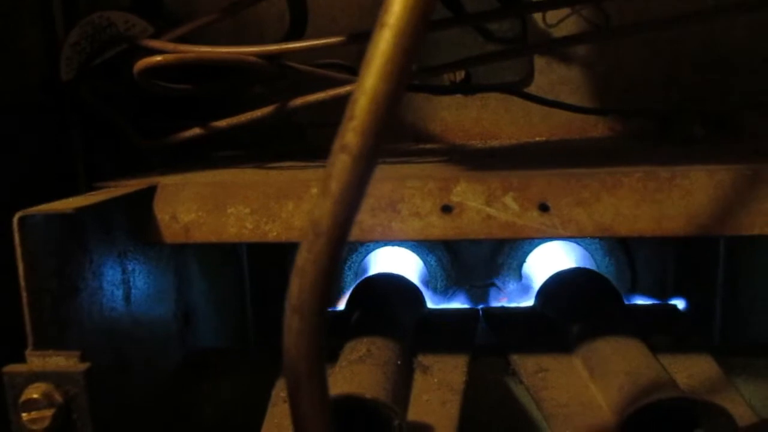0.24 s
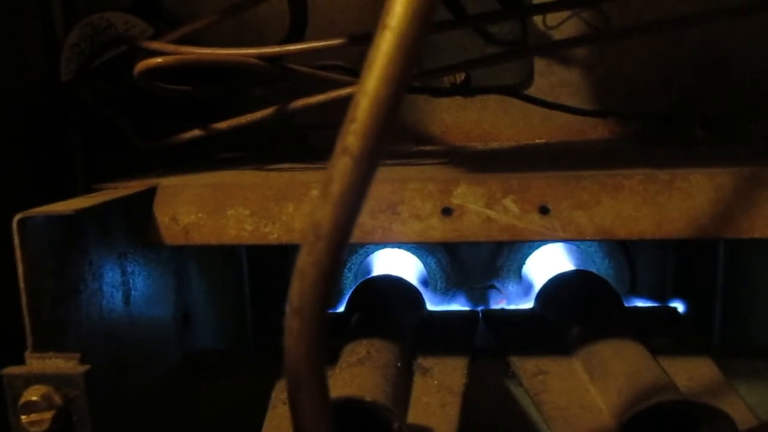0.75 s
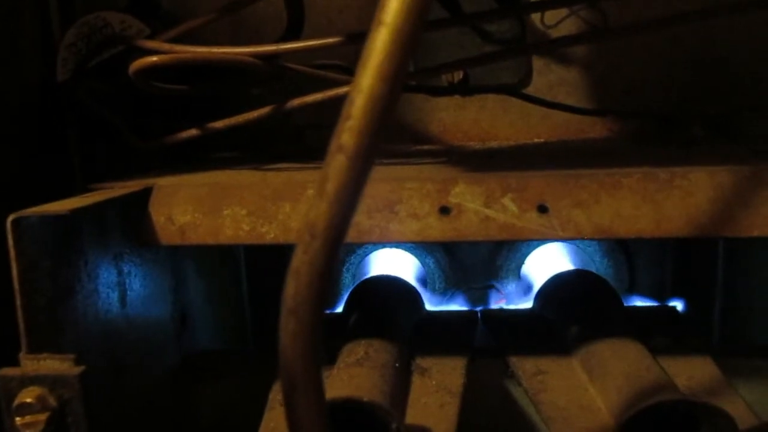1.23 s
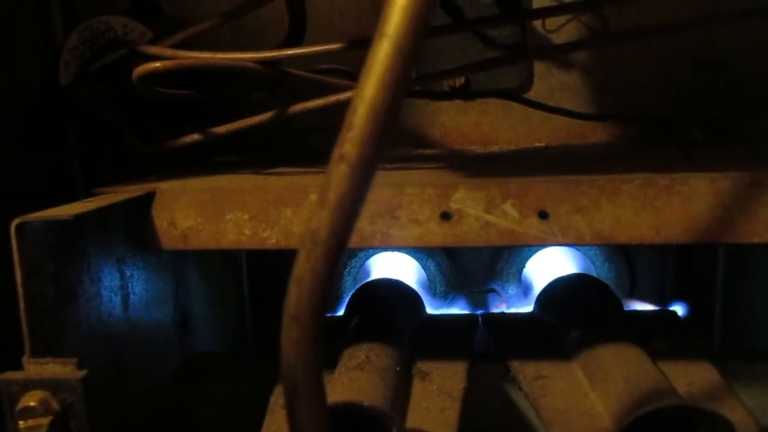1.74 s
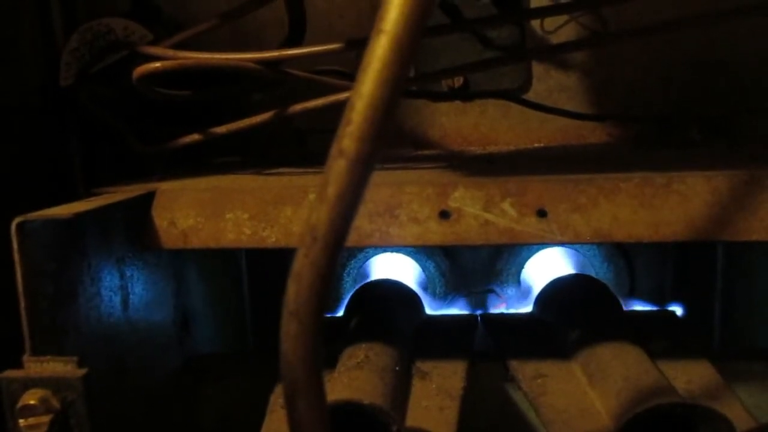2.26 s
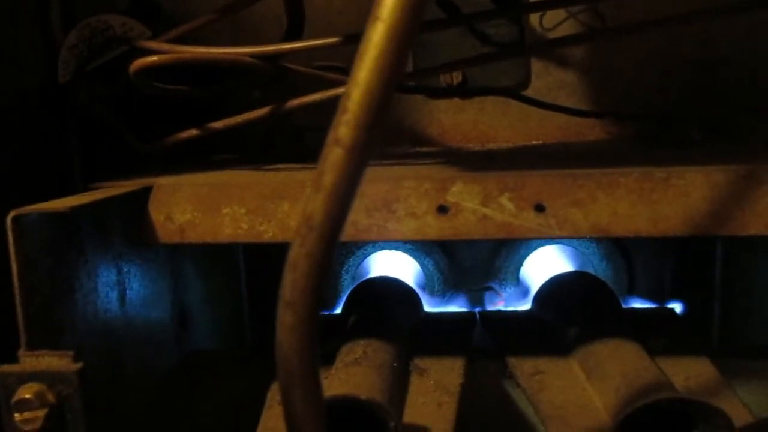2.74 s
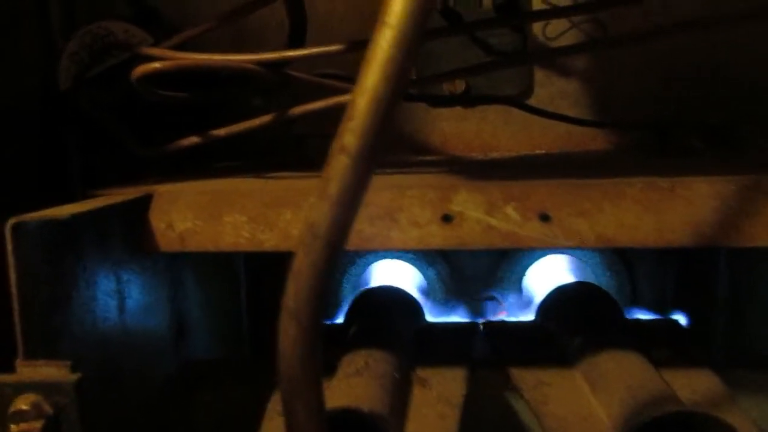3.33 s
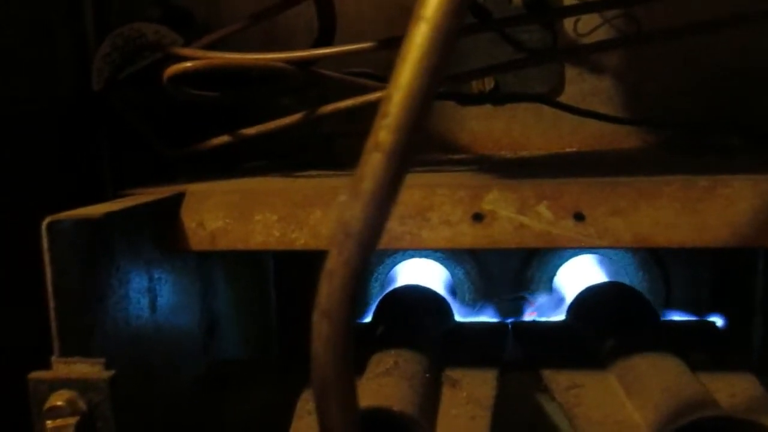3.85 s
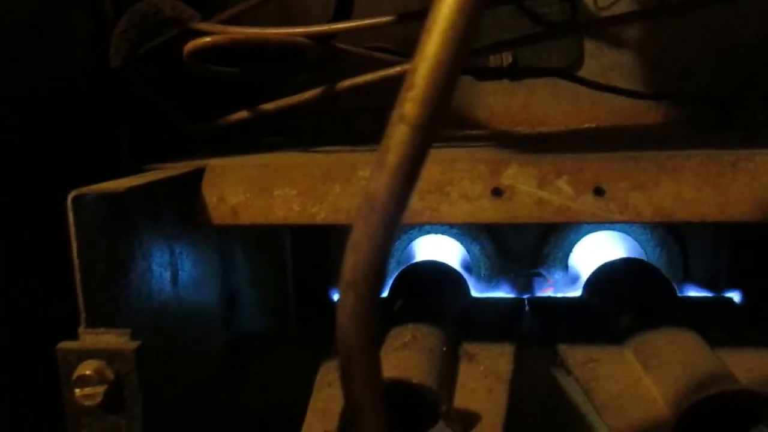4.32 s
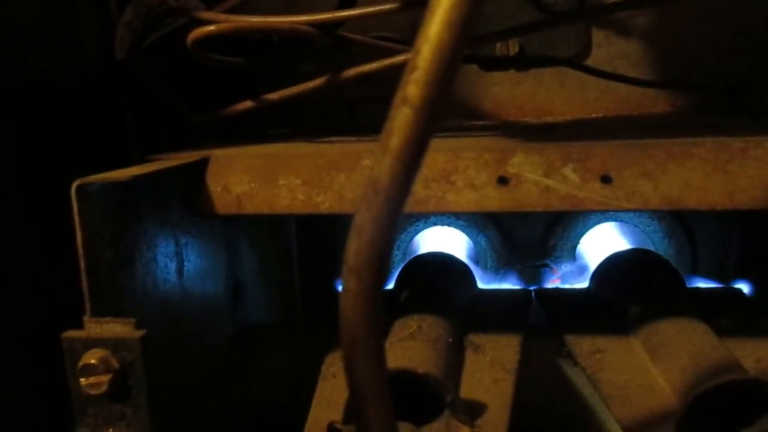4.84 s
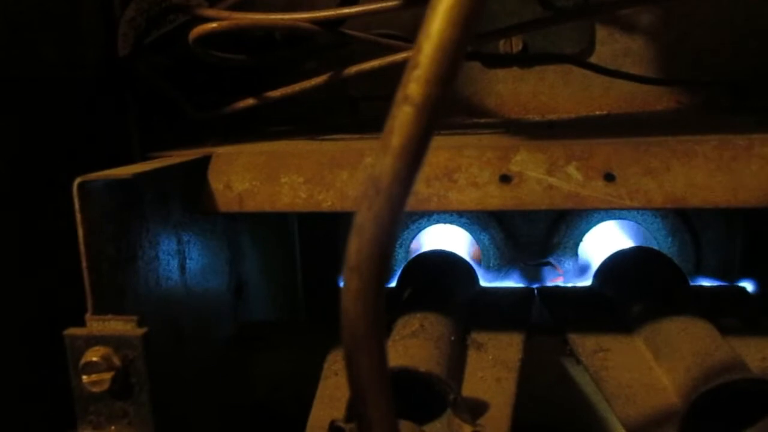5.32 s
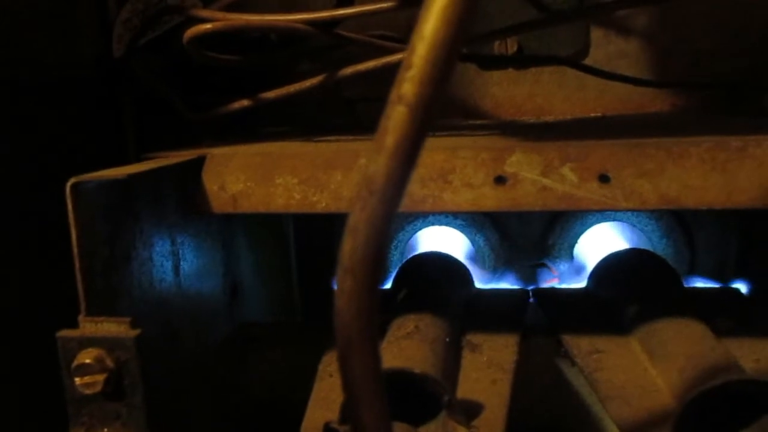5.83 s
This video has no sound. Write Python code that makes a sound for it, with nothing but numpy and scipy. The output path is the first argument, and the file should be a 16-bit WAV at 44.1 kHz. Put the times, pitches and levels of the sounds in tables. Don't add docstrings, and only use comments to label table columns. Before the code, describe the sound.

Continuous furnace burner roar, dominated by bass: uneven, pulsing rumble from a sheet-metal chamber, hollow ringing exchanger tubes and muted flame noise. Gas jets add a quiet, slightly whistling hiss, and blower motors hold a faint tone near 920 hertz. Mono close microphone in a small indoor space; strong bass surges press the level near its ceiling, and automatic gain dips slightly then creeps up again.

```python
import sys
import numpy as np
from scipy import signal
from scipy.fft import rfft, irfft, next_fast_len
from scipy.io import wavfile
from scipy.ndimage import uniform_filter1d

SR = 44100
rng = np.random.default_rng(int(sys.argv[2]) if len(sys.argv) > 2 else 0)


def undo_db(level):
    steps = np.asarray(level, float) / 20
    return 10 ** steps


def pcm_store(signal):
    levels = np.round(np.clip(np.atleast_2d(signal), -1, 1) * 32767)
    wavfile.write(sys.argv[1], SR, levels.astype(np.int16).T)


N = 267819
T = np.arange(N) / SR
M = next_fast_len(N)
HZ = np.fft.rfftfreq(M, 1 / SR)


def evened(x):
    return x / np.sqrt(np.mean(x ** 2) + 1e-20)


def read(points, hz):
    f, value = np.transpose(points)
    return np.interp(np.log(hz + 1), np.log(f + 1), value)


def bell(x):
    return np.exp(-np.log(16) * x ** 2)


def noise(colour_db):
    white = rfft(rng.standard_normal(M))
    return evened(irfft(white * undo_db(colour_db), M)[:N])


def drift(top_hz):
    return noise(-10 * np.log10(1 + (HZ / top_hz) ** 4))


def surging(s, peak_db, length_s, rest_db, throb_db=2):
    throb_hz, steady_s = 33, 0.47
    lull_db, lull_span = -5.5, 0.87
    apart = (T[::64, None] - s) / length_s
    lull = bell(apart / (2 * lull_span)).max(1)
    throb = drift(throb_hz)
    throb = evened(throb - uniform_filter1d(throb, int(steady_s * SR)))[::64]
    rest = undo_db(2 * (rest_db + throb_db * throb + lull_db * lull))
    power = rest + bell(apart) @ undo_db(2 * peak_db)
    return np.interp(T, T[::64], 10 * np.log10(power))


def mode(colour_db, level_db, hold_s):
    ring = noise(colour_db)
    swell = signal.oaconvolve(ring ** 2, np.hanning(int(hold_s * SR)), "same")
    return evened(ring / np.sqrt(swell + 0.26 * swell.mean())) * undo_db(level_db)


# t/s, upper mode level/dB, lower mode level/dB, length/s
BOOM_SURGES = [(0.134, -18, -9.5, 0.042), (0.238, -11, -30, 0.046), (0.337, -14.5, -15.5, 0.033),
               (0.525, -15, -17, 0.044), (0.643, -16, -21, 0.044), (0.73, -19, -10, 0.015),
               (0.98, -12.5, -31, 0.13), (1.108, -10, -22, 0.029), (1.327, -12, -16, 0.036),
               (1.63, -10.5, -29, 0.029), (1.753, -12.5, -12.5, 0.042), (1.886, -32, -15, 0.046),
               (2.05, -24, -15, 0.051), (2.164, -13, -5.5, 0.021), (2.621, -15.5, -11.5, 0.037),
               (2.815, -12, -11, 0.071), (3.032, -11.5, -24, 0.079), (3.139, -8.5, -22.7, 0.032),
               (3.336, -14.5, -18, 0.065), (3.45, -15, -35, 0.1), (3.7, -10.4, -16, 0.046),
               (3.82, -7, -26, 0.017), (3.9, -11.5, -15.5, 0.11), (4.329, -8, -12, 0.042),
               (4.916, -8.3, -21, 0.074), (5.281, -7.5, -23, 0.021), (5.566, -9.5, -16, 0.024),
               (5.771, -8.5, -27, 0.029), (5.882, -9.5, -14.5, 0.022), (6.013, -14.5, -15, 0.09)]
# t/s, level/dB, length/s
TUBE_SURGES = [(0.092, -19, 0.039), (0.554, -17, 0.042), (0.688, -24.5, 0.087), (0.819, -18, 0.021),
               (0.927, -19.5, 0.073), (1.193, -29, 0.027), (1.387, -18.2, 0.11), (1.88, -22, 0.059),
               (1.976, -17, 0.035), (2.178, -17.5, 0.017), (2.383, -20, 0.02), (2.466, -22, 0.062),
               (2.949, -20, 0.049), (3.045, -19.5, 0.022), (3.124, -19, 0.031), (3.214, -24.5, 0.085),
               (3.316, -18, 0.03), (3.469, -28, 0.062), (3.623, -19.3, 0.028), (3.702, -18.5, 0.021),
               (3.928, -20, 0.048), (4.35, -18, 0.081), (4.834, -19.5, 0.027), (4.928, -17, 0.051),
               (5.12, -18, 0.043), (5.52, -22, 0.077), (5.712, -17, 0.012), (5.817, -21, 0.092)]
# f/Hz, density/(dB per Hz)
BOOM_COLOUR = [(21, -46), (35, -24), (54, -22.5), (85, -6), (108, 3), (128, 0.5), (156, -15), (190, -29),
               (250, -41), (420, -120)]
# f/Hz, density/(dB per Hz)
TUBE_COLOUR = [(150, -59), (250, -20.5), (284, -0.5), (296, 8.5), (312, 3), (345, -30.5), (450, -52),
               (760, -120)]


def chamber(split_hz=104):
    s, upper_db, lower_db, length_s = np.transpose(BOOM_SURGES)
    boom_db = read(BOOM_COLOUR, HZ)
    side = ((HZ + 1) / split_hz) ** 12
    upper_colour_db = boom_db - 10 * np.log10(1 + 1 / side)
    lower_colour_db = boom_db - 10 * np.log10(1 + side)
    upper = mode(upper_colour_db, surging(s, upper_db, length_s, rest_db=-20), hold_s=0.034)
    lower = mode(lower_colour_db, surging(s, lower_db, length_s, rest_db=-17), hold_s=0.1)
    tubes_db = surging(*np.transpose(TUBE_SURGES), rest_db=-26)
    tubes = mode(read(TUBE_COLOUR, HZ), tubes_db, hold_s=0.097)
    return upper + lower + tubes


# t/s, level/dB, length/s
FLAME_SURGES = [(0.317, -28, 0.071), (0.614, -31, 0.11), (0.749, -26.5, 0.034), (0.93, -26, 0.032),
                (1.171, -21, 0.02), (1.687, -29.5, 0.058), (1.907, -31.5, 0.054), (2.17, -25.3, 0.044),
                (2.623, -28, 0.073), (2.73, -24.5, 0.025), (3.004, -27.5, 0.029), (3.208, -32, 0.024),
                (3.464, -30.5, 0.036), (3.675, -28.5, 0.026), (4.932, -28, 0.068), (5.59, -28, 0.11)]
# f/Hz, density/(dB per Hz)
ROAR_COLOUR = [(20, -30), (60, -8), (150, 0), (330, 0), (420, -10), (900, -13), (1100, -20), (1900, -25),
               (3300, -29), (4200, -36), (6000, -38), (7000, -44), (10500, -43.7), (15700, -52.8)]
RESONANCE_HZ = [222, 343, 387, 414, 480, 552, 603, 642, 684, 732, 754, 873, 1030, 1145, 1235, 1260, 1450,
                1860, 2150, 2178, 2330, 2750, 3620, 3757, 4488, 5090, 5355, 5810, 9300, 10100]
# width/Hz, level above roar/dB
RESONANCE_SHAPE = [(13, 2), (14, -4.5), (38, 12), (16, -4.5), (30.2, 3.5), (39.8, 7), (10, -3), (22, -4.5),
                   (26, 6.5), (22, -10.5), (17, 5.5), (23.4, 8), (40, 2.5), (20, -4), (35, 7), (16, 3.5),
                   (70, 0.5), (120, 0), (226, 6.5), (60, 6.5), (100, -3), (383, 3), (160, 2), (52, 6.5),
                   (30, 7.5), (120, 4.5), (130, 6.5), (200, 4), (160, 2), (700, 1)]


def roar(split_hz=1300, flames_db=-31.0, roar_db=-8):
    peaks_db = np.zeros(len(HZ))
    for hz, (width_hz, db) in zip(RESONANCE_HZ, RESONANCE_SHAPE):
        peaks_db += db * bell((HZ - hz) / width_hz)
    low_share = 1 / (1 + (HZ / split_hz) ** 4)
    surge_db = surging(*np.transpose(FLAME_SURGES), rest_db=-30, throb_db=1.3) - flames_db
    wide = rfft(rng.standard_normal(M)) * undo_db(roar_db + read(ROAR_COLOUR, HZ) + peaks_db)
    flames = irfft(wide * low_share, M)[:N] * undo_db(0.82 * surge_db)
    flutter_db = 0.3 * drift(12)
    jets = irfft(wide * (1 - low_share), M)[:N] * undo_db(0.08 * surge_db + flutter_db)
    whistle = irfft(wide * np.exp(-((HZ - 2165) / 110) ** 2), M)[:N]
    swell = uniform_filter1d(whistle ** 2, int(0.25 * SR))
    flicker = undo_db(1.4 * drift(25)) * np.sqrt(swell.mean() / swell)
    return flames + jets + whistle * (flicker - 1)


# sideband number, level/dB
SLOT_SIDEBANDS = [(0, -48), (1, -50), (2, -52), (3, -57.5), (4, -64)]
TONE_HZ = [926.6, 1100.2, 1158.1, 4170, 15734]
TONE_DB = [-54, -67, -62, -78, -81.5]


def motors(waver_db=3.5, slip_hz=0.11):
    slot_hz, mains_twice_hz = 922.45, 119.97
    slip = np.cumsum(slip_hz * drift(0.2)) / SR
    lines = [(slot_hz + k * mains_twice_hz, db) for k, db in SLOT_SIDEBANDS]
    lines += list(zip(TONE_HZ, TONE_DB))
    hum = np.zeros(N)
    for hz, db in lines:
        level_db = db + waver_db * (hz < 15000) * drift(0.65)
        hum += np.sqrt(2) * undo_db(level_db) * np.sin(2 * np.pi * (hz * T + slip + rng.random()))
    return hum


# t/s, peak level/dB, f/Hz
TICKS = [
    (0.5182, -49, 7450),
    (0.9487, -45, 7510),
    (3.6421, -49, 7540),
    (5.5772, -48, 7450),
]


def pings(t60_s=0.041, rise_s=0.0018):
    ticks = np.zeros(N)
    for s, db, hz in TICKS:
        age = np.maximum(T - s, 0)
        rise = np.minimum(age / rise_s, 1)
        ticks += undo_db(db - 60 * age / t60_s) * rise * np.sin(2 * np.pi * hz * age)
    return ticks


def scene():
    return (chamber() + roar() + motors() + pings())[None]


# f/Hz, threshold under nearby level/dB
GATE_THRESHOLD = [(6000, -10), (8000, -6.5), (11000, -4.5), (13000, -3.2), (15500, -2)]


def gate(x):
    hz, _, z = signal.stft(x, SR, nperseg=2048, noverlap=1536)
    power = abs(z) ** 2
    patch = uniform_filter1d(uniform_filter1d(power, size=5, axis=1), size=4, axis=2)
    around = uniform_filter1d(uniform_filter1d(power, size=41, axis=1), size=9, axis=2)
    weak = patch < around * undo_db(2 * read(GATE_THRESHOLD, hz))[:, None]
    shut = weak & (hz > GATE_THRESHOLD[0][0])[:, None]
    return signal.istft(z * (1 - 0.97 * shut), SR, nperseg=2048, noverlap=1536)[1][:, :N]


# t/s, drop/dB
GAIN_TRIPS = [
    (0.734, 2.5),
    (1.33, 2.5),
    (1.77, 0),
    (2.185, 3.5),
    (2.74, 1.17),
    (3.705, 3.5),
    (4.33, 2.5),
    (4.94, 1.05),
    (5.29, 0.93),
]


def gain_control(x):
    falls_db = sum(db * np.clip((T - s) / 0.0055, 0, 1) for s, db in GAIN_TRIPS)
    creep_db = 0.076 + 2.956 * T
    return x * undo_db(creep_db - falls_db)


def roll_off(x):
    return signal.sosfilt(signal.butter(12, 15745, fs=SR, output="sos"), x)


def record(dry):
    cut = signal.sosfilt(signal.butter(2, 48, "high", fs=SR, output="sos"), dry)
    notched = signal.lfilter(*signal.iirnotch(7867, 38, SR), gain_control(cut))
    held = notched / (1 + abs(notched / 1.02) ** 12) ** (1 / 12)
    faded = held * np.minimum((T[-1] - T) / 0.004, 1)
    return roll_off(gate(faded))


dry = scene()
out = record(dry)
pcm_store(out)
```